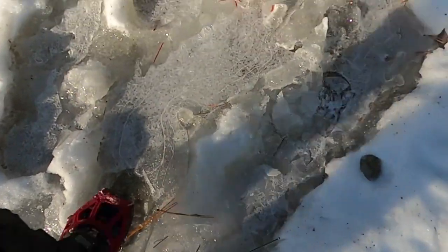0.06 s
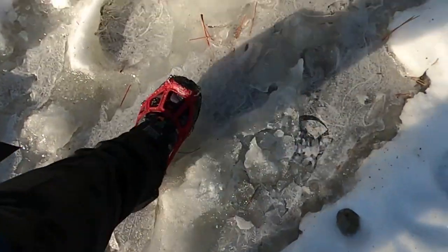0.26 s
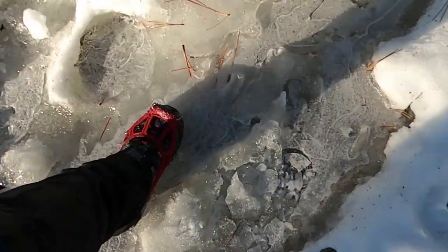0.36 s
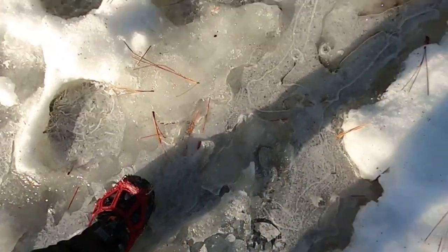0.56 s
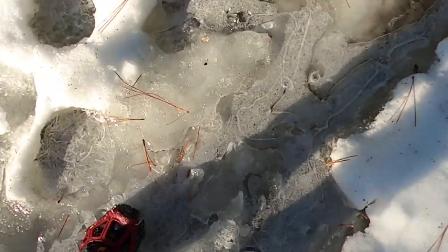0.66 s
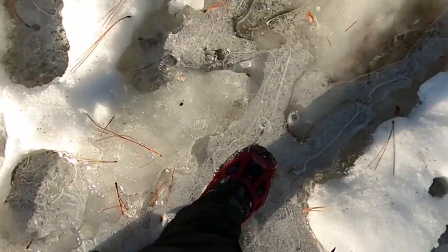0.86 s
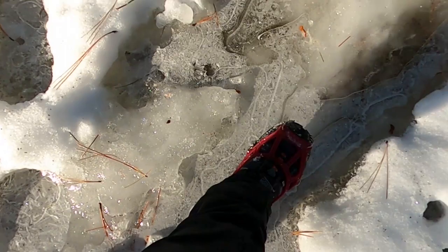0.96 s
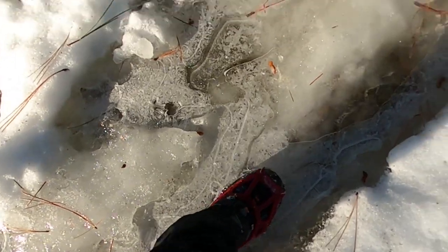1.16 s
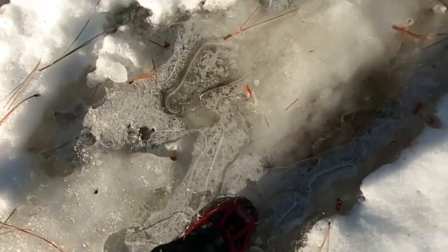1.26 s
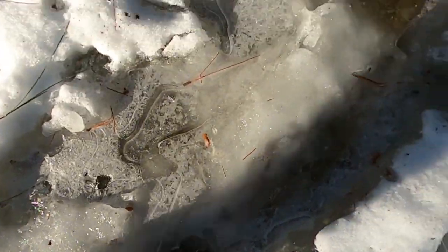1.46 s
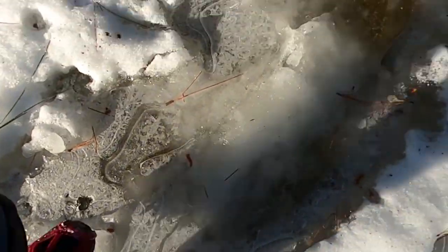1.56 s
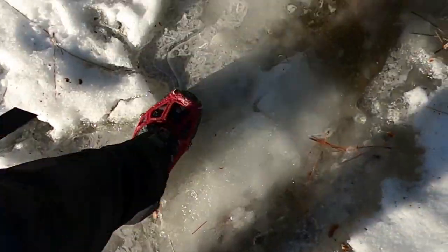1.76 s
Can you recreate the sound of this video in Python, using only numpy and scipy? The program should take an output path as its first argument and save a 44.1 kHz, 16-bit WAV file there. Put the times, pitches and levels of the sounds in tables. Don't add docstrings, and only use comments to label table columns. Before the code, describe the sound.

Thin ice breaking under spiked boots, very close outdoors. Small glassy ticks at 0-0.2 s, a hard crack and thump at 0.23, then a dense crunch at 0.38-0.6 with dull slosh. Sparse ticks and light knocks until 0.93; cracking resumes at 0.95 and builds to a louder, longer collapse at 1.05-1.57, overloading slightly, then scattered shards and knocks to 1.8 over faint wind and hiss.

```python
import sys
import numpy as np
from scipy import signal
from scipy.fft import rfft, irfft, next_fast_len
from scipy.io import wavfile
from scipy.ndimage import uniform_filter1d, map_coordinates

SR = 44100
rng = np.random.default_rng(int(sys.argv[2]) if len(sys.argv) > 2 else 0)


def makeup_ratio(level_db):
    decades = np.asarray(level_db, float) / 20
    return 10 ** decades


def transcribe(signal):
    frames = np.atleast_2d(signal).T
    limited = np.clip(frames, -1, 1)
    pcm = np.round(limited * 32767).astype(np.int16)
    wavfile.write(sys.argv[1], SR, pcm)


N = 79380


def unit(x):
    return x / np.sqrt(np.mean(x ** 2) + 1e-20)


def coloured(x, points):
    size = next_fast_len(N + 8192)
    hz, db = np.transpose(points)
    bins_hz = np.fft.rfftfreq(size, 1 / SR)
    gain = makeup_ratio(np.interp(np.log(bins_hz + 1), np.log(hz + 1), db))
    return irfft(rfft(x, size) * gain, size)[:N]


def thin(x, hz, order=3):
    return signal.sosfilt(signal.butter(order, hz, "high", fs=SR, output="sos"), x)


def wobble(rate):
    knots = rng.standard_normal(int(N * rate / SR) + 4)
    return map_coordinates(knots, [np.arange(N) * rate / SR])


def rings(s, gain, hz, t60, rise_s, size):
    t = np.arange(size) / SR
    tone = gain[:, None] * np.sin(2 * np.pi * hz[:, None] * t)
    wave = tone * makeup_ratio(-60 * t / t60[:, None]) * (1 - np.exp(-t / rise_s))
    at = np.round(s * SR).astype(int)[:, None] + np.arange(size)
    return np.bincount(at.ravel(), wave.ravel(), N + size)[:N]


def struck(rows, ratios, drop_db, rise_s, size):
    s, db, hz, t60 = np.transpose(rows)
    u = rng.standard_normal((len(s), len(ratios), 2))
    out = rings(s, makeup_ratio(db), hz, t60, rise_s, size)
    for k, ratio in enumerate(ratios):
        late = s + 0.0003 * np.abs(u[:, k, 1])
        gain = makeup_ratio(db + drop_db + 2 * u[:, k, 1])
        partner_hz = np.minimum(hz * ratio * np.exp(0.142 * u[:, k, 0]), .4 * SR)
        out = out + rings(late, gain, partner_hz, t60 / max(ratio, 1), rise_s, size)
    return out


# (frequency [Hz], level [dB])
HISS_COLOUR = [(120, -9), (200, 4), (815, -26), (1620, -15), (7180, -14), (12000, -23), (15600, -54),
               (22000, -120)]
# (frequency [Hz], level [dB])
WIND_COLOUR = [(12, -2), (35, 0), (60, -30), (85, -46), (200, -70)]
HISS_DB, WIND_DB = -57.5, -54
LULL_S, LULL_DB = (.88, 1.1), -11


def air():
    t = np.arange(N) / SR
    lull_db = LULL_DB * uniform_filter1d(1. * (t > LULL_S[0]) * (t < LULL_S[1]), size=1500)
    hiss = makeup_ratio(HISS_DB + 0.82 * wobble(29.5)) * unit(coloured(rng.standard_normal(N), HISS_COLOUR))
    wind = unit(coloured(rng.standard_normal(N), WIND_COLOUR))
    return hiss + makeup_ratio(WIND_DB + lull_db + 1.2 * wobble(4.8)) * wind


# (time [s], level [dB], shards over slabs [dB])
BOOT_LOAD = [(0, -61, 16.5), (.12, -60.5, 14.5), (0.202, -66, 10), (0.232, -30.5, -12.5),
             (0.287, -47.5, 13), (.36, -33.5, -1.5), (.43, -24, 5), (0.585, -25.5, 8), (.69, -40.5, 0.5),
             (.72, -45, 3.5), (0.899, -51.5, 11.5), (0.999, -33.5, 2.5), (1.12, -28.5, 1.5), (1.18, -23, 9),
             (1.42, -25.5, 3.5), (1.529, -38.5, 10.5), (1.74, -36, 6), (1.775, -52, 6.5)]


def boot_load(t):
    s, level_db, share_db = np.transpose(BOOT_LOAD)
    return np.interp(t, s, level_db), np.interp(t, s, share_db)


# (from [s], to [s])
SLUSH_SPANS = [
    (.39, .68),
    (1.149, 1.8),
]
SLUSH_DB = -4.5


def slush():
    t = np.arange(N) / SR
    load_db, _ = boot_load(t)
    dull = unit(coloured(rng.standard_normal(N), [(30, -1.5), (220, 22.5), (500, -28)]))
    wet = sum((t > a) * (t < b) for a, b in SLUSH_SPANS)
    return wet * makeup_ratio(load_db + SLUSH_DB + 3 * wobble(40)) * dull


# (time [s], peak level [dB], pitch [Hz], t60 [s])
HEEL_THUMPS = [(.237, -5, 224, 0.029), (.417, -13, 237, 0.1), (.478, -6, 86, 0.059), (.47, -10, 253, 0.11),
               (.558, -14.5, 190, 0.024), (.51, -8.5, 198, 0.062), (.62, -15, 175, 0.01),
               (1.16, -8.5, 218, 0.088), (1.21, -8.5, 206, 0.092), (1.31, -16, 77, 0.054),
               (1.368, -7.5, 220, 0.031), (1.552, 1, 216, 0.04), (.103, -39, 170, .04),
               (.268, -25, 174, 0.035), (1.1, -26, 160, .05)]


def thumps():
    return thin(struck(HEEL_THUMPS, (1.35, 2.0), -6, 0.0014, size=7000), hz=46.6)


# (time [s], peak level [dB], pitch [Hz], t60 [s])
SLAB_KNOCKS = [(.0365, -37.5, 890, 0.039), (.107, -30.5, 540, 0.039), (.2345, -4.5, 1430, 0.018),
               (.235, 0.5, 526, 0.0095), (.451, -10, 487, 0.017), (.617, -38, 1090, 0.044),
               (.655, -17, 894, 0.057), (.684, -20.5, 763, .03), (.755, -25.5, 857, 0.043),
               (.9495, -6.5, 561, 0.032), (.973, -20, 850, 0.034), (1.008, -18, 1160, 0.013),
               (1.031, -29, 610, 0.024), (1.056, -16.5, 510, 0.034), (1.081, -11, 858, 0.05),
               (1.101, -18, 771, 0.078), (1.159, 4.5, 551, 0.027), (1.258, 2.5, 626, 0.019),
               (1.41, -9, 604.4, 0.01), (1.433, -1, 1079, 0.051), (1.4765, 3.5, 386, 0.0067),
               (1.548, -7.5, 428, 0.039), (1.573, -16, 1290, 0.031), (1.597, -17, 900, 0.014),
               (1.676, -20.5, 474, 0.026), (1.731, -22, 1336, 0.085), (1.797, -29, 583, 0.037),
               (.938, -26, 573, 0.055), (.914, -39, 1410, 0.018), (1.001, -23, 794, 0.018),
               (.387, -4.5, 866, 0.024), (.506, 1, 770, 0.013), (.615, -25, 1050, 0.022),
               (1.24, -6, 600, .02), (1.284, -10, 905, 0.024), (1.368, 1.5, 423, .012),
               (1.382, -0.5, 464, 0.0088), (1.434, -3.5, 848, 0.07), (1.441, -10, 930, 0.035),
               (1.454, -11, 870, .025), (.381, -7, 1570, .035), (.478, -4.5, 340, 0.043),
               (.9505, -15.5, 1127, 0.033), (.95, -12, 717, 0.019), (1.549, -9.5, 1850, .02),
               (1.332, -9.5, 2930, .05), (1.244, -9, 2890, 0.044)]


def knocks():
    return thin(struck(SLAB_KNOCKS, (.8, 1.3, 2.1), -9.5, 0.00049, size=4000), hz=224)


# (time [s], peak level [dB], pitch [Hz])
SHARD_TICKS = [(0.0372, -18, 3100), (0.0677, -35, 3650), (0.0999, -13.5, 4400), (0.1057, -15, 2910),
               (0.118, -7, 4900), (0.2354, 5.5, 3090), (0.2616, -5.5, 3060), (0.2679, -24, 3140),
               (0.2897, -9, 2360), (0.3066, -11.5, 4730), (0.3274, -5.5, 3000), (0.3366, -13, 2280),
               (0.3403, -4.5, 3820), (0.6822, -15, 2040), (0.7545, -15, 2120), (0.7836, -13, 3380),
               (0.8169, -17, 3880), (0.8518, -19, 3020), (0.889, -24, 3400), (0.9138, -18.5, 3030),
               (0.927, -15.5, 3170), (0.048, -47, 3040), (.1785, -35, 3000), (0.6557, -16.5, 2900),
               (.7305, -35, 2780), (.745, -21, 3400), (0.771, -21, 2970), (.82, -17, 6700),
               (0.869, -36, 4000), (.877, -36, 4400), (.937, -14, 4200), (.236, -11.5, 5580),
               (.384, -5, 2360), (.5555, -1, 4340),
               (0.9507, -7.5, 4400), (1.0074, -23, 6000), (1.0289, -21, 6500), (1.0486, -1, 3000),
                     (1.058, -6.5, 2270), (1.0812, 4.5, 3000), (1.118, -8, 2940), (1.1304, 0, 2080),
                     (1.1444, -27, 2320), (1.163, 5, 2160), (1.597, -13.5, 2270), (1.629, -5.5, 4400),
                     (1.6787, -4.5, 4130), (1.7513, -14, 1950), (1.7964, -14, 1900), (1.049, -6, 4490),
                     (1.619, -19, 5050), (1.41, -19.5, 7000), (1.471, 0, 3530), (1.485, -11, 2360),
                     (1.505, -19, 2400), (1.55, -4, 3570), (1.6529, -13, 2300), (1.7307, -18.5, 6400),
                     (1.305, 5, 3580), (1.399, -7, 3000)]
TICK_T60_S, GRIT_T60_S = 0.013, 0.027


def ticks():
    rows = np.array([row + (TICK_T60_S,) for row in SHARD_TICKS])
    t, env = np.arange(3000) / SR, np.zeros(N + 3000)
    for s, db, _, _ in rows:
        env[round(s * SR):][:len(t)] += makeup_ratio(db - 60 * t / GRIT_T60_S) * (1 - np.exp(-t / 0.00023))
    grit_colour = [(500, -20), (1500, 7), (6500, -2.0), (9000, -15.5), (16000, -31.0)]
    grit = unit(coloured(rng.standard_normal(N), grit_colour))
    ringing = thin(makeup_ratio(-8) * struck(rows, (.7, 1.45, 1.9), -12.5, 0.00071, size=2000), hz=690)
    return makeup_ratio(-17) * env[:N] * grit + ringing


def grains(count, hz_at, spread, cycles, scatter_db, size):
    s, u = rng.uniform(0, (N - 1) / SR, count), rng.standard_normal((count, 2))
    hz = np.clip(hz_at[(s * SR).astype(int)] * np.exp(spread * u[:, 0]), 120, .4 * SR)
    gain = np.sign(u[:, 1]) * np.sqrt(hz) * makeup_ratio(scatter_db * rng.exponential(size=count))
    x = rings(s, gain, hz, cycles / hz, 1e-4, size)
    return x / np.sqrt(np.abs(uniform_filter1d(x ** 2, size=330)) + .04 * np.mean(x ** 2))


# (time [s], length [s], level [dB], shards over slabs [dB], slab pitch [Hz])
FRACTURE_RUNS = [(0.38, 0.0051, -9.5, -21, 950), (0.387, 0.012, -11.5, 2.5, 890),
                 (0.408, 0.019, -23, -6, 564), (0.456, 0.012, -15, 7.5, 940), (0.469, 0.0095, -8, 1, 990),
                 (0.477, 0.018, -14.5, 2.5, 810), (.494, 0.006, -10.5, -1, 940), (.504, 0.016, -12, 2, 756),
                 (0.519, 0.014, -21, 6, 865), (0.533, 0.0078, -11.5, -3, 1420),
                 (0.554, 0.012, -14, 8, 1094), (.574, 0.0067, -21, 13, 1070),
                 (0.589, 0.0041, -31.5, 16, 1340), (1.129, 0.017, -20, -10, 714),
                 (1.185, 0.005, -12, 5.5, 1540), (1.195, 0.015, -13.5, 3, 1470),
                 (1.213, 0.014, -11.5, 4, 940), (1.231, 0.0074, -17, 3, 1090),
                 (1.241, 0.015, -13.5, 6.5, 837), (1.258, 0.0043, -12, -3, 700),
                 (1.265, 0.014, -15.5, 6, 790), (1.277, .01, -11.5, -1.5, 950),
                 (1.289, 0.0048, -21.5, 3, 1020), (1.302, 0.012, -14, 7, 1430),
                 (1.318, 0.0087, -18.5, 7.5, 990), (1.326, 0.023, -14, 0, 1220),
                 (1.351, 0.016, -15, 3, 1220), (1.38, 0.012, -18, -8, 1370), (1.43, 0.017, -16, 5.5, 1010),
                 (1.451, 0.004, -11.5, 4.5, 910), (1.467, 0.0032, -26.5, 8, 1420),
                 (1.546, 0.0081, -12, 4, 1337)]
# (frequency [Hz], level [dB])
SHARD_COLOUR = [(530, -5), (900, 2), (1420, -5), (2500, -6.5), (4000, -10), (7000, -9.5), (8300, -16),
                (15500, -29.5)]
# (from [s], to [s])
PAUSES = [
    (1.013, 1.028),
    (1.603, 1.619),
    (1.292, 1.303),
]
PAUSE_DB, SHARD_DB = -7, -7
RISE_S, FALL_S = .001, .0028


def crunch():
    t = np.arange(N) / SR
    load_db, share_db = boot_load(t)
    held = uniform_filter1d(sum(1. * (t > a) * (t < b) for a, b in PAUSES), size=130)
    slab = makeup_ratio(load_db + PAUSE_DB * held) * makeup_ratio(2.1 * wobble(130))
    shard = slab * makeup_ratio(share_db)
    pitch, weight = 850 * slab, slab.copy()
    for start, length, db, bright_db, hz in FRACTURE_RUNS:
        rise = np.clip((t - start) / RISE_S, 0, 1)
        shape = makeup_ratio(db) * rise * np.exp(-np.clip(t - start - length, 0, 1) / FALL_S)
        slab, shard = slab + shape, shard + makeup_ratio(bright_db) * shape
        pitch, weight = pitch + hz * shape, weight + shape
    low = grains(count=2600, hz_at=pitch / weight, spread=.38, cycles=15., scatter_db=3.2, size=1000)
    low = thin(low, hz=245)
    high = grains(count=6000, hz_at=np.full(N, 4000.), spread=0.572, cycles=19.5, scatter_db=0.0, size=300)
    high = unit(coloured(unit(high) + .6 * rng.standard_normal(N), SHARD_COLOUR))
    return thin(slab * low + makeup_ratio(SHARD_DB + 1.3 * wobble(150)) * shard * high, hz=170)


# (frequency [Hz], side under mid [dB])
PORTS_APART = [(30, -24), (200, -40), (1500, -36.5), (4000, -33.5), (9000, -25), (14000, -23)]


def scene():
    mid = air() + slush() + thumps() + knocks() + ticks() + crunch()
    side = makeup_ratio(3.0) * coloured(mid * wobble(71), PORTS_APART)
    return np.array([mid + side, mid - side])


def roll_off(x):
    return signal.sosfilt(signal.butter(12, 15680, fs=SR, output="sos"), x)


def record(dry):
    ceiling, hardness = 1.02, 12
    mix = dry / (1 + np.abs(dry / ceiling) ** hardness) ** (1 / hardness)
    return roll_off(mix)


dry = scene()
out = record(dry)
transcribe(out)
```